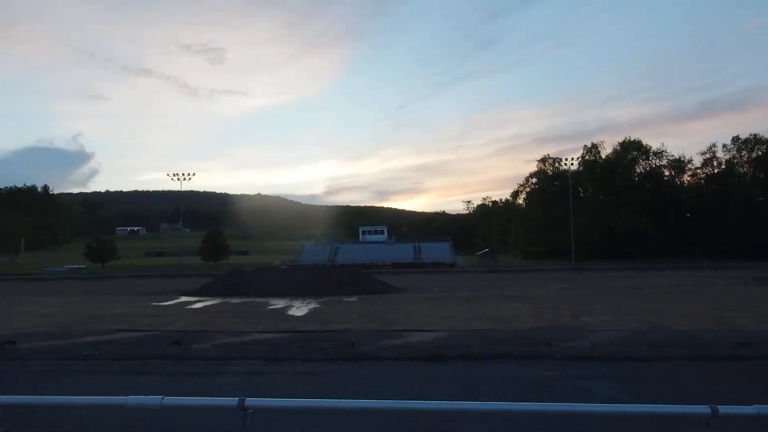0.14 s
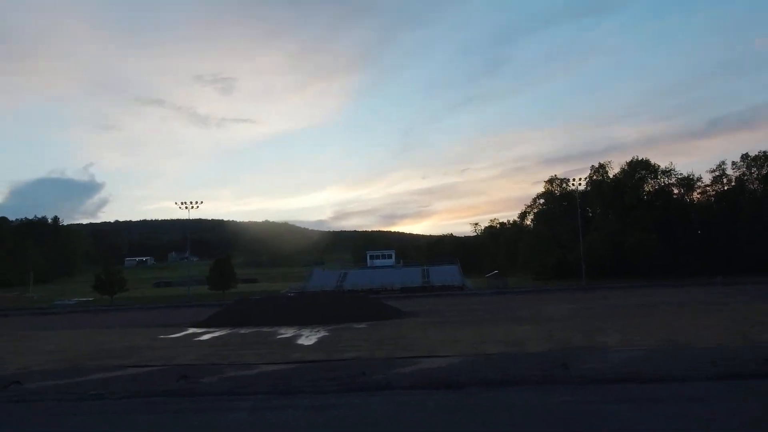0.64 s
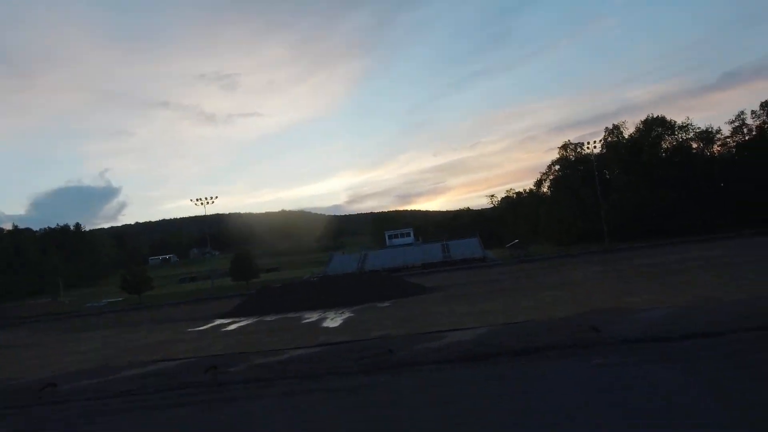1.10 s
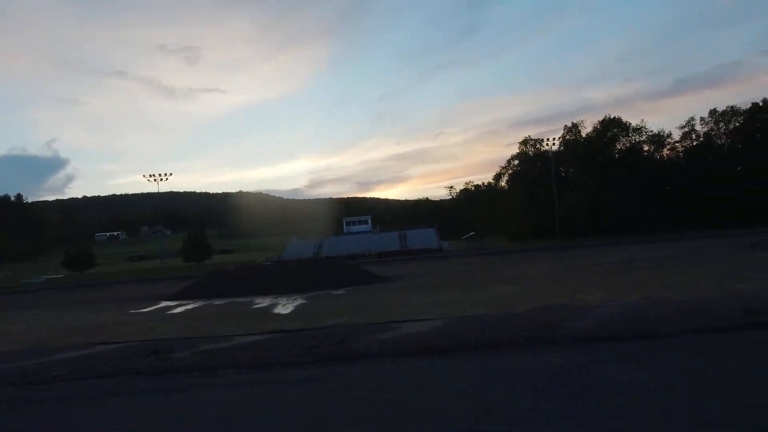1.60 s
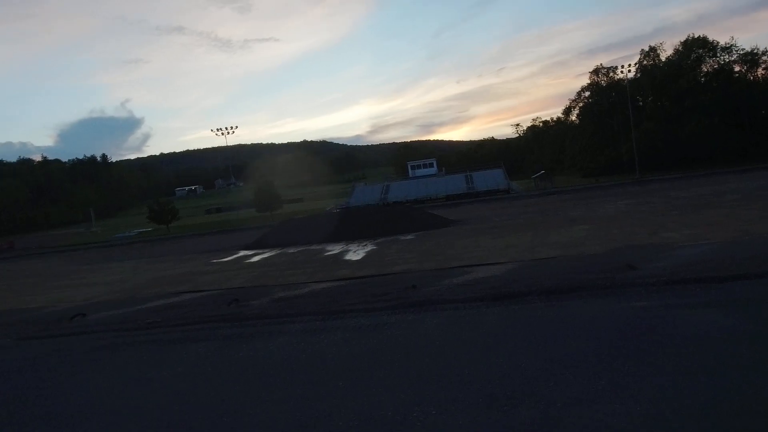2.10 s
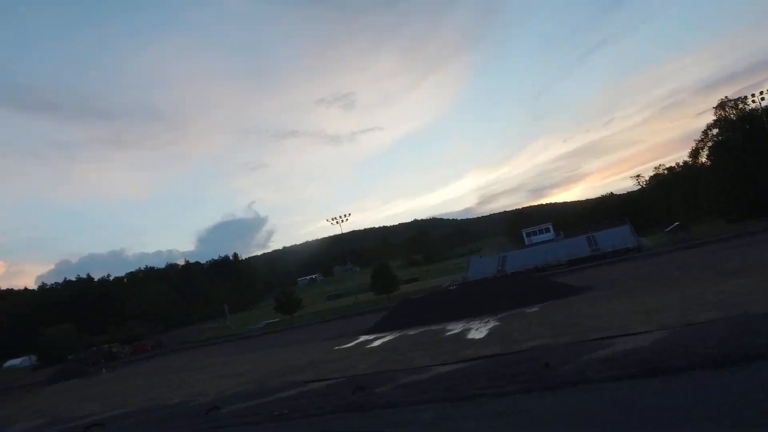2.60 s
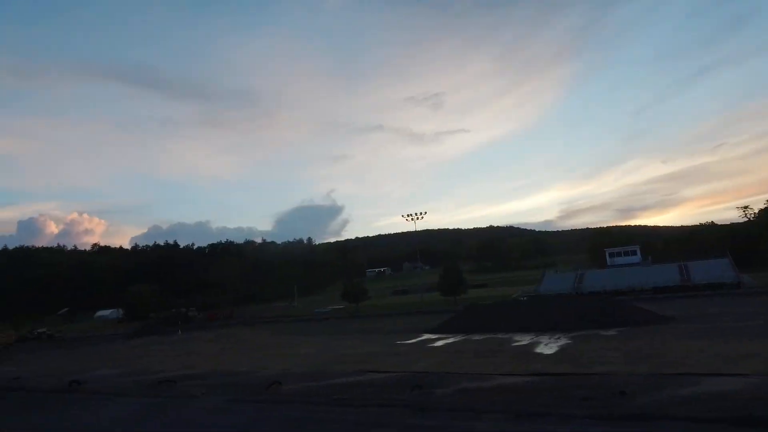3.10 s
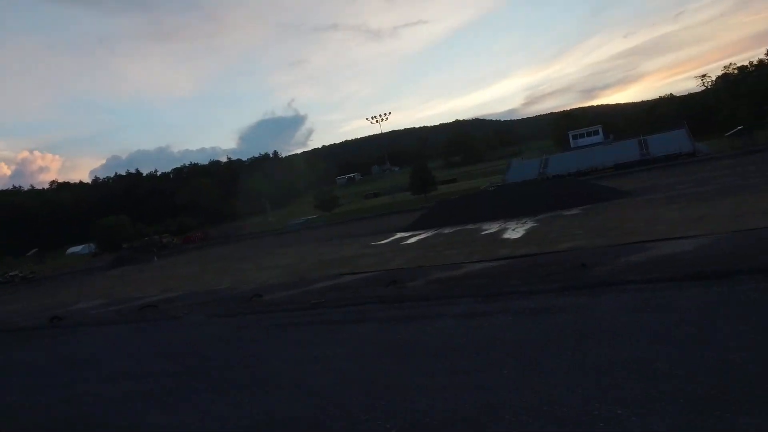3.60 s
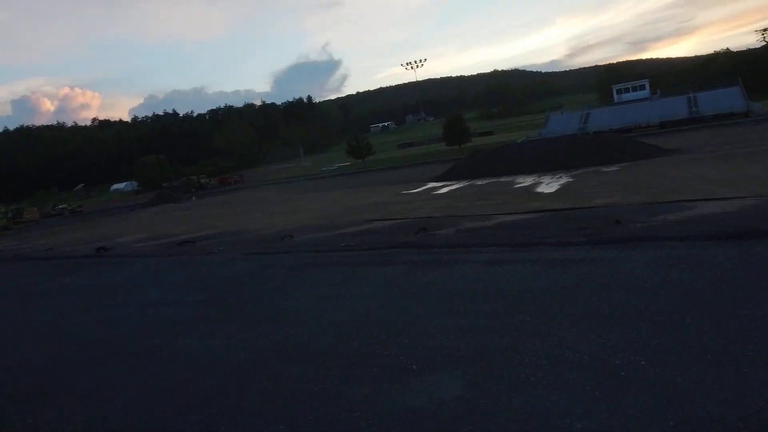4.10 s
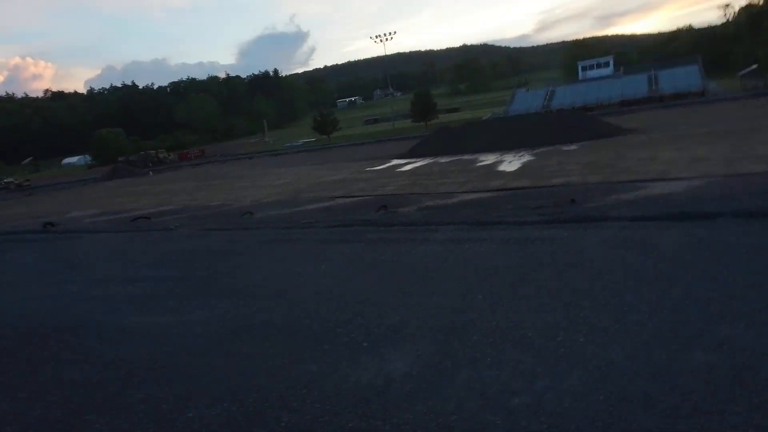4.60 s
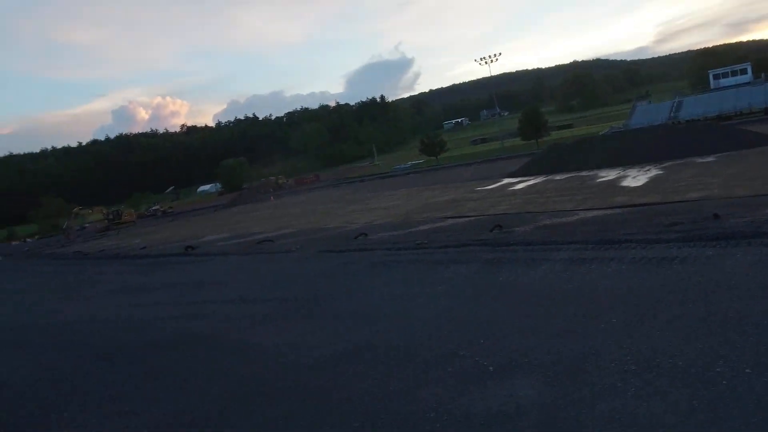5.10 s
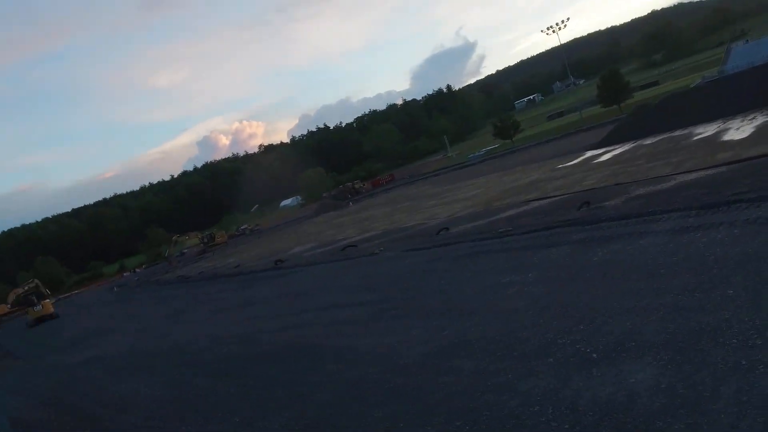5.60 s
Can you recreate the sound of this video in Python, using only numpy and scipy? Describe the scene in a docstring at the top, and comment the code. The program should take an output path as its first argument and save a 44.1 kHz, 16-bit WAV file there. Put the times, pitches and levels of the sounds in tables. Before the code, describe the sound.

Outdoors at dusk, a walker leaves a metal grandstand. A tread is already ringing at the start, and a much heavier boom with a sharp tick follows before one second. Lighter gritty scuffs come after, fading by about three and a half seconds. The low rumble dies over a faint hum, while birds peep and whistle and insects throb faintly. Handheld phone, close stereo.

```python
"""A metal grandstand at dusk, left by a walker with a phone: two heavy treads boom through frame and planks.
Lighter scuffing steps follow, made of grit clicks in resonances; the rumble dies away over a faint hum, both of
noise in narrow bands. Birds, near-sine notes, call close by and from the tree line, with an echo off the trees.
Katydids, noise gated by wing strokes and tooth bursts, throb high up in a smooth hiss of evening air."""
import sys
import numpy as np
from scipy import signal
from scipy.fft import rfft, irfft
from scipy.io import wavfile
from scipy.ndimage import uniform_filter1d

SR = 44100
rng = np.random.default_rng(int(sys.argv[2]) if len(sys.argv) > 2 else 0)


def store_wav(level_fs):
    """Save 16-bit WAV to argv[1]."""
    pcm = np.round(np.clip(np.atleast_2d(level_fs), -1, 1) * 32767)
    wavfile.write(sys.argv[1], SR, pcm.T.astype(np.int16))


def level_to_linear(level):
    """Convert decibel levels to linear amplitude factors, elementwise."""
    exponent = np.asarray(level, float) / 20
    return 10 ** exponent


N = 252693
T = np.arange(N) / SR  # s
HZ = np.fft.rfftfreq(N, 1 / SR) + 1e-3  # kept off zero for the logarithm


def level(x, db):
    """Set the rms."""
    return x * level_to_linear(db) / np.sqrt(np.mean(x ** 2))


def along(table, hz=HZ):
    """Read (Hz, value) points on a log-frequency axis."""
    f, v = np.transpose(table)
    return np.interp(np.log(hz), np.log(f), v)


def ring(x, hz, width):
    """Two-pole resonance, gain 1 at the centre."""
    return signal.lfilter(*signal.iirpeak(hz, hz / width, fs=SR), x)


def steep(x, hz, width):
    """The resonance twice, for dark skirts."""
    return ring(ring(x, hz, width), hz, width)


def walk(rate):
    """Random levels held 1 / rate s and slewed twice; spread near 1."""
    k = int(SR / rate)
    held = np.repeat(rng.standard_normal(N // k + 1), k)
    return 1.3 * uniform_filter1d(uniform_filter1d(held, k), k)[:N]


def ports(a, b, alike):
    """Two unrelated versions of a spread-out sound, mixed by frequency as close microphone ports hear it."""
    likeness = np.clip(along(alike), 0, 1)
    mid = irfft(rfft(a) * np.sqrt((1 + likeness) / 2), N)
    side = irfft(rfft(b) * np.sqrt((1 - likeness) / 2), N)
    return np.array([mid + side, mid - side])


def pan(db):
    """Left and right gains for a left minus right difference in dB."""
    return level_to_linear(np.array([db, -db]) / 2)


def fade(n, edge):
    """Soft start and end, each edge seconds long, for a short sound."""
    k = np.arange(n)
    return np.clip(np.minimum(k, n - k) / (edge * SR), 0, 1)


# Modes of the frame underfoot: deep, upper, and the murmur above them.
# Each row: centre in Hz, width in Hz, level in dB within its layer.
DEEP_MODES = [(55.9, 23.7, -1), (76, 34, -2.5)]
UPPER_MODES = [(101.6, 22, -2.5), (118.2, 32.7, 4.5), (165.4, 27, -4)]
MURMUR_MODES = [(239.5, 120, 6), (353, 140, -5.5), (491, 95, -7)]
# Swells of the frame's shaking, at the steps and between them.
# Each row: time in s, shudder of the deep modes, upper modes and murmur in dB.
FRAME_SWELLS = [(0.0, -51, -44, -42.5), (0.045, -37.5, -33.5, -51), (0.829, -26, -31, -45.5),
                (0.96, -42, -40, -45.5), (1.0, -40, -32.5, -55), (1.09, -35.5, -37, -83),
                (1.282, -38, -44, -54), (1.44, -41, -46, -59), (1.57, -43.5, -55, -67),
                (1.9, -39.5, -42, -58), (1.96, -38.5, -40, -64), (2.088, -49, -51, -59.5),
                (2.27, -50, -70, -70), (2.45, -48.5, -53, -72), (2.59, -46, -48.5, -61),
                (2.82, -46, -52, -64), (3.3, -66, -59, -75)]
# For deep, upper and murmur: slow sway against the quick shudder in dB.
SWAY_BELOW_SHUDDER_DB = (-13.5, -15.5, -24)
# For deep, upper and murmur: level of the distant traffic under it all in dB.
TRAFFIC_DB = (-72.5, -68, -79)
# Fall by 60 dB, in s, for deep, upper and murmur.
SHUDDER_T60_S, SWAY_T60_S = (0.45, 0.39, 0.46), (4.9, 5.55, 5.8)
SWELL_RISE_S = 0.019  # rise ahead of each swell's time


def sway():
    """Frame modes shaken at random: each swell dies as a quick shudder and a slow sway over steady rumble."""
    out = 0
    highpass = signal.butter(4, 44, "highpass", fs=SR, output="sos")  # little passes under the lowest mode
    for k, modes in enumerate((DEEP_MODES, UPPER_MODES, MURMUR_MODES)):
        shaking = sum(level_to_linear(db) * level(steep(rng.standard_normal(N), hz, width), 0) for hz, width, db in modes)
        shaking = signal.sosfilt(highpass, shaking)
        power = level_to_linear(TRAFFIC_DB[k]) ** 2
        for s, *swell_db in FRAME_SWELLS:
            t = np.maximum(T - s, 0)
            shudder = level_to_linear(-60 * t / SHUDDER_T60_S[k]) ** 2
            slow = level_to_linear(SWAY_BELOW_SHUDDER_DB[k] - 60 * t / SWAY_T60_S[k]) ** 2
            rise = np.clip(1 + (T - s) / SWELL_RISE_S, 0, 1) ** 2
            power = power + level_to_linear(swell_db[k]) ** 2 * (shudder + slow) * rise
        out = out + level(shaking, 0) * np.sqrt(power)
    return out


# A wavering hum that moves off. Each row: time in s, level of the stronger band in dB.
HUM_LEVELS = [(0, -51.5), (.75, -51.5), (3.0, -56), (3.55, -52.5), (3.68, -65.5), (4.6, -60.5), (5.73, -68)]
# Each row: centre in Hz, width in Hz, level in dB against the stronger band.
HUM_MODES = [(119.84, 13.8, 0), (175, 19, -11)]


def hum():
    """Noise in two narrow low bands, which waver because they are narrow."""
    s, db = np.transpose(HUM_LEVELS)
    bands = sum(level(steep(rng.standard_normal(N), hz, width), g) for hz, width, g in HUM_MODES)
    return bands * level_to_linear(np.interp(T, s, db))


# Katydid phrases high up. Each row: start in s, length in s, gain of the high bands and of the low bands in dB.
KATYDID_PHRASES = [(0.077, 0.16, -78, -73.5), (0.38, 0.24, -87, -79), (0.774, .45, -85, -80),
                   (1.264, 0.094, -84, -68), (1.445, 0.55, -87, -78.5), (1.995, .36, -83.5, -77),
                   (2.464, 0.086, -81, -71), (2.596, 0.53, -87.5, -74.5), (3.34, 0.11, -85, -69),
                   (3.468, 0.76, -85.5, -75), (4.083, 0.12, -82, -71.5), (4.236, 0.26, -84, -78.5),
                   (4.445, 0.11, -81, -71), (4.603, 0.4, -84, -72.5), (5.165, 0.14, -83, -73),
                   (5.317, 0.53, -87, -76)]
PHRASE_EDGE_S, REST_DB = 0.032, (-89, -80)  # rest gain of the high and the low bands


def phrases(rows, rest_db):
    """Gain of a chorus that swells into phrases over a quiet rest."""
    gain = level_to_linear(rest_db)
    for s, length, db in rows:
        inside = np.minimum(T - s, s + length - T)
        gain = np.maximum(gain, level_to_linear(db) * np.clip(inside / PHRASE_EDGE_S + .5, 0, 1))
    return gain


# Wing resonances. Each row: centre in Hz, width in Hz, level in dB before the phrase gain.
WING_BANDS = [(7110, 280, -18), (8976, 470, -4.5), (10220, 210, -14), (11650, 230, -7.5), (13720, 750, 3)]
THROB_HZ, TOOTH_HZ = 24.3, 176  # mean rates; both waver


def katydid():
    """Wing strokes of uneven length in a steady throb, each a few uneven tooth bursts, ringing the wing's bands."""
    high, low = (phrases(np.array(KATYDID_PHRASES)[:, [0, 1, 2 + k]], REST_DB[k]) for k in range(2))
    throb = np.sin(2 * np.pi * (THROB_HZ * T + .12 * walk(3)))
    stroke = np.clip(1.5 + 1.3 * walk(14) + 2.2 * throb, .18, 1)
    tooth_phase = 2 * np.pi * np.cumsum(TOOTH_HZ * (1 + .15 * walk(12))) / SR
    teeth = level_to_linear(5.0 * np.sin(tooth_phase) + 1.5 * walk(60))
    out = 0
    for hz, width, db in WING_BANDS:
        middle, side = rng.standard_normal((2, N))
        rasp = middle + .3 * side * np.array([[1], [-1]])
        rasp = rasp * stroke * teeth * level_to_linear(1.5 * walk(40))
        out = out + level(steep(rasp, hz, width), db) * (high if hz > 11000 else low)
    return out * pan(0.66)[:, None]


# Tilt of the evening air. Each row: frequency in Hz, relative density in dB per Hz.
AIR_TILT = [(90, -21), (150, -2.5), (324, -15.5), (1500, -28), (2600, -27.5), (7000, -33.5), (8000, -36.5),
            (9000, -33), (11500, -36.5), (12600, -47.5), (13700, -52), (15000, -63)]
# Spread-out air at the two ports. Each row: frequency in Hz, likeness of left and right [0 to 1].
AIR_LIKENESS = [(130, 1.), (290, 0.89), (640, 0.69), (1400, 0.36), (3000, 0.26), (15000, 0.4)]


def air():
    """Evening air: smooth distant hiss that swells a little."""
    a, b = (irfft(rfft(rng.standard_normal(N)) * level_to_linear(along(AIR_TILT)), N) for _ in range(2))
    return level(ports(a, b, AIR_LIKENESS), -68) * level_to_linear(0.11 * walk(4.9))


# Soles dragging grit underfoot.
# Each row: start in s, drag in s, sole level in dB, grit level in dB before its 3.7 dB lift.
SOLE_DRAGS = [(0.0, 0.019, -54, -76), (0.795, .02, -34, -58), (1.276, .03, -44, -82),
              (1.89, 0.067, -56.5, -72), (2.438, .03, -49.5, -71), (2.81, 0.035, -70, -76),
              (3.29, 0.061, -83, -83)]
# Fine hiss cresting as each foot rolls to the toe. Each row: crest in s, level in dB before its 1.2 dB lift.
TOE_ROLLS = [(.105, -64.5), (.86, -60.5), (1.325, -69), (1.93, -82), (2.505, -68.5), (2.83, -84),
             (3.36, -93)]
# How each sole sounds as it drags.
# Each row: three resonances in Hz, second and third against the first in dB, left minus right in dB.
SOLE_RESONANCES = [(988, 720, 2630, -2, -10, -0.5), (714, 940, 4700, -40, -31, 1),
                   (700, 1480, 2400, -11, -24, -1.9), (1025, 1490, 2220, 1, -5.5, -2.4),
                   (574, 1060, 1410, 0.2, -4, -2.2), (1180, 1430, 2300, 1, -22, 1),
                   (680, 1300, 2000, 4, -4, .3)]
LIFT_DB_PER_S = (179, 148)  # sole and grit fade once the drag ends
LAND_S, LAND_DB = 0.0089, -18  # the sole loads up from this far below
ROLL_WIDTH_S = 0.041  # the hiss is 10 dB down this far from its crest


def scuffs():
    """Dense grit clicks of uneven size excite the sole's resonances, a broad crunch and a fine hiss."""
    out = np.zeros((2, N))
    for (s, drag, *peaks), (roll, roll_db), resonances in zip(SOLE_DRAGS, TOE_ROLLS, SOLE_RESONANCES):
        low_hz, mid_hz, high_hz, mid_db, high_db, pan_db = resonances
        i, j = int(s * SR), int((s + drag + .22) * SR)
        n = j - i
        t = T[i:j] - s
        land = LAND_DB * np.clip(1 - t / LAND_S, 0, 1)
        after = np.maximum(t - drag, 0)
        sole_db, grit_db = (peak + land - lift * after for peak, lift in zip(peaks, LIFT_DB_PER_S))
        fine_db = roll_db - 10 * np.abs(t + s - roll) / ROLL_WIDTH_S
        struck = rng.random(n) < .15
        clicks = rng.standard_normal((2, n)) * level_to_linear(1.85 * rng.exponential(size=n)) * struck
        clicks *= level_to_linear(2.0 * walk(60)[i:j])  # the sole sticks and slips
        low = level(steep(clicks[0], low_hz, 150), 0)
        for side in range(2):
            shared = clicks[0] + 0.52 * clicks[1] * (-1) ** side
            mid = level(steep(shared, mid_hz, 360), mid_db)
            high = level(steep(clicks[side], high_hz, 390), high_db)
            crunch = level(steep(clicks[side], 1600, 4300), -11)
            sole = level(low + mid + high + crunch, 0)
            grit = level(steep(clicks[side], 4300, 4200), 3.7)
            fine = level(steep(clicks[side], 9360, 3200), 1.2)
            scuff = level_to_linear(sole_db) * sole + level_to_linear(grit_db) * grit + level_to_linear(fine_db) * fine
            out[side, i:j] += scuff * pan(pan_db)[side] * fade(n, 0.0012)
    return out


# Treads on the planks. Each row: start in s, ring gain in dB, loudest frequency in Hz,
# fall away from it in dB per octave, rattle time constant in s, wash gain in dB.
PLANK_TREADS = [(0.001, -32, 300, -32, .02, -34), (0.792, -46.5, 408, -4, 0.025, -30),
                (0.85, -43, 330, -18, 0.018, -36), (0.96, -52.5, 330, -35, 0.028, -56),
                (1.41, -55.5, 263, -16, 0.083, -51)]
# Plank modes. Each row: centre in Hz, gain in dB against the ring, fall by 60 dB in s.
PLANK_MODES = [(244.7, -2, 0.76), (279.3, -2.5, 0.49), (309.6, 0.5, 0.564), (360.6, 2.5, 0.35),
               (363, -31, 0.33), (463, -24, .5), (528, -0.5, 0.25), (535, -28.5, 0.45), (604, -25.5, 0.11),
               (703, 2, 0.27), (731, 3, 0.16), (770, -12, .2), (860, -29, 0.18), (908, 11.5, 0.07),
               (1046, 8, 0.17), (1058, -0.5, 0.34), (1234, 7.5, 0.19), (1690, -16.5, 0.086),
               (1672, 19.5, 0.045), (1950, -1.5, 0.05), (2420, -1, 0.068)]
# The many close modes heard as a wash. Each row: centre in Hz, gain in dB against the wash, fall by 60 dB in s.
WASH_BANDS = [(216, -9, 0.89), (330, -10, 0.4), (520, -29, 0.87), (790, -8, 0.3), (1260, -10, 0.2),
              (1900, -2, 0.083), (3130, -0.5, 0.19), (5000, -23.5, .25), (7400, -39, 0.15),
              (11500, -22, 0.17)]


def treads():
    """Each tread rattles the planks for a moment; detuned modes beat and ring over a wash of decaying noise."""
    out = np.zeros(N)
    noises = [level(steep(rng.standard_normal(N), hz, .7 * hz), 0) for hz, _, _ in WASH_BANDS]
    t = T[:int(.8 * SR)]
    n = len(t)
    for s, ring_db, top_hz, tilt_db, rattle, wash_db in PLANK_TREADS:
        i = int(s * SR)
        push = rng.standard_normal(n) * np.exp(-t / rattle) / np.sqrt(rattle * SR)
        for hz, db, t60 in PLANK_MODES:
            gain = level_to_linear(ring_db + db + tilt_db * abs(np.log2(hz / top_hz)))
            r = np.exp(-np.log(1000) / (t60 * SR))
            # neighbouring planks are tuned a little apart
            for w in 2 * np.pi * hz * (1 + 0.0366 * rng.standard_normal(5)) / SR:
                mode = signal.lfilter([np.sin(w)], [1, -2 * r * np.cos(w), r * r], push)
                out[i:i + n] += gain * mode
        for (hz, db, t60), noise in zip(WASH_BANDS, noises):
            gain = level_to_linear(wash_db + db + tilt_db * abs(np.log2(hz / top_hz)))
            tail = level_to_linear(-60 * t / t60) * np.clip(t / 0.0006, 0, 1)
            out[i:i + n] += gain * tail * noise[i:i + n]
    return out


# Planks underfoot at the two ports. Each row: frequency in Hz, likeness of left and right [0 to 1].
PLANK_LIKENESS = [(130, 1.), (290, .995), (640, .97), (1400, .62), (3100, .15), (6800, .2), (15000, .5)]


def planks():
    """The treads drawn twice at random and spread over the ports."""
    return ports(treads(), treads(), PLANK_LIKENESS)


NOTE_EDGE_DB = -18.5  # start and end of a note against its crest
HOOK_S = .03  # time constant of a hook settling


def arch(s, length, hz, db, crest=.5, hook=0., glide_hz=0.):
    """One note: level swells to a crest and sinks, pitch hooks down by a share or glides in Hz per s."""
    t = np.arange(int(length * SR)) / SR
    u = t / length - crest
    u = u / np.where(u < 0, crest, 1 - crest)
    return s, hz * (1 + hook * np.exp(-t / HOOK_S)) + glide_hz * t, db + NOTE_EDGE_DB * u ** 2


def far(notes, **shape):
    """Shape every row of a table of far notes."""
    return [(*arch(*note, **shape), pan_db) for *note, pan_db in notes]


# Each row: start in s, length in s, settled pitch before the sag in Hz, crest in dB, left minus right in dB.
HOOK_NOTES = [(0.1, .1, 2280, -75, 4), (0.2, 0.076, 2270, -85, 7), (1.375, .11, 2310, -67, -3),
              (2.575, .15, 2330, -66, -6), (3.095, 0.13, 2140, -77.5, -6), (4.51, 0.13, 3515, -67, 7.5),
              (5.1, 0.05, 2590, -70, 6), (2.945, 0.051, 2690, -76, -3)]


def hooks():
    """Far notes that start 15 percent sharp, settle and sag."""
    return far(HOOK_NOTES, crest=0.34, hook=.15, glide_hz=-700)


# Each row: start in s, length in s, pitch in Hz, crest in dB, left minus right in dB.
SEET_NOTES = [(.285, .085, 7460, -83, 5.5), (.68, 0.14, 7580, -80, -3), (1.21, 0.17, 6850, -68, 7),
              (1.66, 0.16, 6810, -71.5, 5)]


def seets():
    """Thin, high far notes of level pitch."""
    return far(SEET_NOTES, crest=.45)


CHORUS_PER_S, CHORUS_DB, CHORUS_HZ = 9, -86, (2100, 5200)  # mean level, pitch range


def chorus():
    """Faint far notes at random times and pitches, in the rows of a note table."""
    when, length, pitch, loud, place = rng.random((int(CHORUS_PER_S * N / SR), 5)).T
    hz = CHORUS_HZ[0] * (CHORUS_HZ[1] / CHORUS_HZ[0]) ** pitch
    db = CHORUS_DB + 8 * (loud - .5)
    return list(zip(when * (N / SR - .2), .05 + .1 * length, hz, db, 12 * (place - .5)))


# Each row: start in s, length in s, pitch in Hz, crest in dB, left minus right in dB.
PEEP_NOTES = [(.43, 0.089, 2920, -72.5, -6), (.42, .08, 3820, -77.5, -3), (.63, 0.065, 2900, -66.5, -10),
              (.635, 0.038, 3600, -84, 0), (1.145, .075, 2940, -53, -9), (1.21, .05, 2850, -72, 3),
              (1.345, 0.097, 2860, -72, 9), (1.74, 0.042, 2850, -69, -7), (1.76, .06, 3900, -83, -4),
              (1.865, 0.041, 2900, -59, -2), (1.893, 0.047, 3840, -69.5, -4), (3.56, 0.11, 2300, -80, -10),
              (3.65, 0.12, 2310, -64.5, -5), (3.81, .12, 2690, -78, 10), (4.03, 0.074, 3120, -82, -2),
              (4.19, .13, 4630, -77.5, 3), (4.41, .11, 2830, -75, 6), (4.5, 0.077, 2420, -77, 8),
              (5.0, 0.12, 2090, -82, -6), (5.09, 0.043, 2877, -65.5, 4), (5.16, 0.061, 2500, -76, 2.5),
              (5.32, .05, 2460, -79, -3), (5.345, .05, 4830, -73, 10)]


def peeps():
    """Short far notes of level pitch, with the faint chorus among them."""
    return far(PEEP_NOTES + chorus(), crest=0.54)


# Each row: start in s, length in s, starting pitch in Hz, crest in dB, left minus right in dB.
RISE_NOTES = [(1.775, 0.071, 2560, -49.5, -4), (3.0, 0.057, 2590, -54, -9), (3.055, 0.067, 2850, -67.5, -5),
              (0.895, .035, 4900, -63.5, 7), (2.042, 0.031, 5250, -53.5, 5)]


def rises():
    """Far notes that glide up."""
    return far(RISE_NOTES, crest=0.59, glide_hz=8500)


# Each row: start in s, length in s, starting pitch in Hz, crest in dB, left minus right in dB.
FALL_NOTES = [(.983, 0.033, 4400, -77, 4), (1.078, .03, 4180, -74, -1), (1.16, 0.053, 4200, -64.5, 1),
              (2.063, 0.025, 5530, -54.5, 2), (2.345, 0.058, 3900, -67, -4), (4.1, .025, 5230, -72, -.5)]


def falls():
    """Far notes that drop steeply."""
    return far(FALL_NOTES, crest=0.2, glide_hz=-27000)


# Each row: start in s, length in s, pitch in Hz, crest in dB, left minus right in dB.
BUZZ_NOTES = [(1.153, 0.11, 6300, -69, -6), (2.08, .05, 5200, -75, 5), (2.87, 0.072, 5950, -72, 0),
              (3.05, 0.096, 3130, -75, 3), (3.63, 0.14, 4700, -77, -2), (3.53, 0.092, 3190, -81, -6)]


def buzzes():
    """Far notes of level pitch; their fast flutter makes the buzz."""
    return far(BUZZ_NOTES, crest=0.26)


# Two clear whistles close by, a table each. Each row: time in s, pitch in Hz, level in dB.
WHISTLE_TRACKS = [
    [(2.1, 3790, -85), (2.164, 3860, -58.5), (2.242, 3912, -50.5), (2.296, 4103, -49.5), (2.358, 4080, -44),
     (2.37, 4050, -44), (2.385, 3830, -96)],
    [(5.483, 4540, -97), (5.493, 4410, -52.5), (5.503, 4400, -57), (5.519, 3840, -63.5), (5.545, 3813, -61),
     (5.703, 4004, -51), (5.73, 4016, -46.5)],
]
# For each whistle: left minus right in dB.
WHISTLE_SIDES = (2, -7)


def whistles():
    """Pitch and level of each whistle, drawn point to point sample by sample."""
    notes = []
    for track, pan_db in zip(WHISTLE_TRACKS, WHISTLE_SIDES):
        s, hz, db = np.transpose(track)
        t = np.arange(s[0], s[-1], 1 / SR)
        notes.append((s[0], np.interp(t, s, hz), np.interp(t, s, db), pan_db))
    return notes


# What the trees return, in dB, of whistles, hooks, rises, falls, peeps, seets, buzzes.
TREE_ECHO_DB = (-24, -8, -13, -13, -9, -12, -9)
TREE_T60_S = 0.68
PORT_RAD = 1.0  # a note reaches the nearer port this far ahead in phase


def birds():
    """Near sines; far notes flutter after crossing leaves and air, and the trees return a short smear."""
    out, send = np.zeros((2, 2, N))
    kinds = (whistles(), hooks(), rises(), falls(), peeps(), seets(), buzzes())
    # flutter of each kind: (spread dB, rate Hz)
    flutters = ((.4, 150), (2.2, 100), (2.3, 150), (3.0, 250), (2.5, 150), (3.0, 150), (3.5, 600))
    for notes, (flutter_db, flutter_hz), echo_db in zip(kinds, flutters, TREE_ECHO_DB):
        flutter = level(level_to_linear(flutter_db * walk(flutter_hz)), 0)
        # the phase shakes at the same rate, which blurs the line
        blur = 0.58 * flutter_db * walk(flutter_hz)
        for s, hz, db, pan_db in notes:
            i = int(s * SR)
            j = i + len(hz)
            lead = PORT_RAD / 2 * np.sign(pan_db) * np.array([[1], [-1]])
            phase = 2 * np.pi * np.cumsum(hz) / SR + blur[i:j] + lead
            tone = np.sqrt(2) * np.sin(phase) * level_to_linear(db) * flutter[i:j]
            note = tone * pan(pan_db)[:, None] * fade(j - i, 0.00163)
            out[:, i:j] += note
            send[:, i:j] += level_to_linear(echo_db) * note
    t = T[:SR // 2]
    trees = rng.standard_normal((2, len(t))) * level_to_linear(-60 * t / TREE_T60_S) * (t > .008)
    trees /= np.sqrt(np.sum(trees ** 2, axis=1, keepdims=True))
    return out + signal.fftconvolve(send, trees, axes=1)[:, :N]


# Heel flexing a plank. Columns: start in s, peak in dB, pitch in Hz, contact in s.
HEEL_THUMP = (0.7877, -12.5, 92, .03)


def thump():
    """A few swings of the plank while the heel loads it."""
    s, db, hz, contact = HEEL_THUMP
    u = np.clip((T - s) / contact, 0, 1)
    return -level_to_linear(db) * np.sin(np.pi * u ** 1.6) * np.sin(2 * np.pi * hz * (T - s))


# First contact of the heel. Columns: time in s, peak in dB before panning, centre in Hz, width in Hz.
HEEL_CRACK = (0.7926, -23, 1800, 1200)


def crack():
    """One sharp tick, damped within a few swings, towards the right port."""
    s, db, hz, width = HEEL_CRACK
    impulse = 1. * (np.arange(N) == int(s * SR))
    tick = steep(impulse, hz, width)
    return -level_to_linear(db) * tick / np.max(np.abs(tick)) * pan(-5.0)[:, None]


def scene():
    """All sources at the two ports."""
    steps = scuffs() + planks() + thump() + crack()
    return sway() + hum() + katydid() + air() + steps + birds()


def band_limit(x):
    """A steep low-pass at the top of the band."""
    return signal.sosfilt(signal.butter(12, 15670, fs=SR, output="sos"), x)


def record(dry):
    """The phone cuts the top, steeply above 14.5 kHz."""
    lowpass = signal.ellip(8, .2, 60, 14500, fs=SR, output="sos")
    return band_limit(signal.sosfilt(lowpass, dry))


dry = scene()
out = record(dry)
store_wav(out)
```